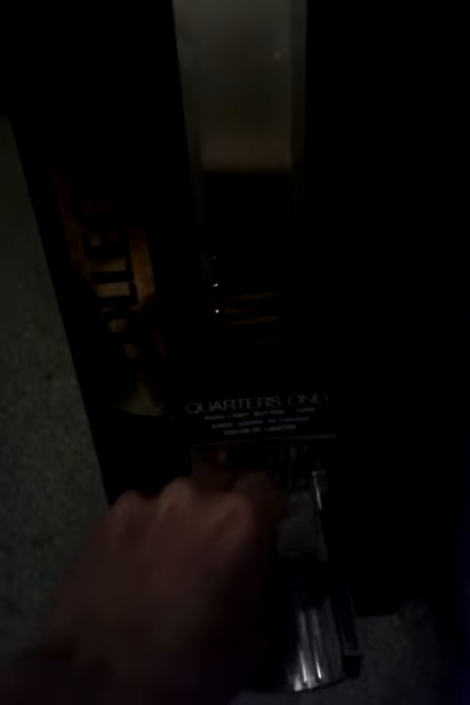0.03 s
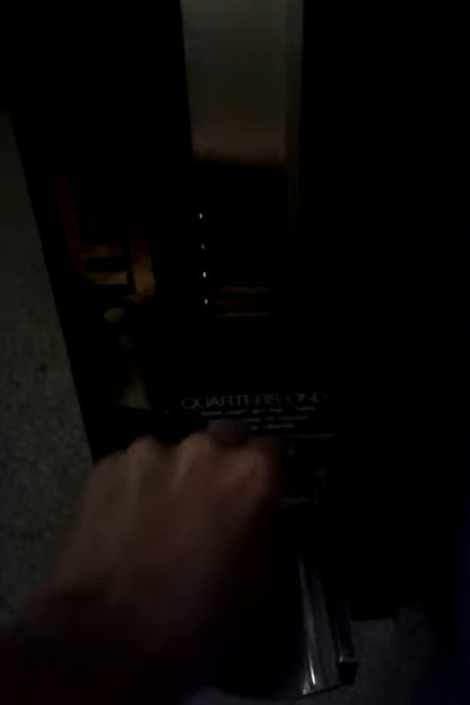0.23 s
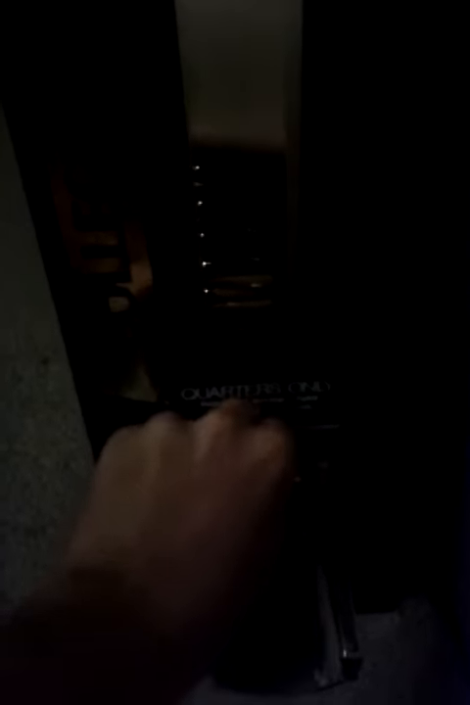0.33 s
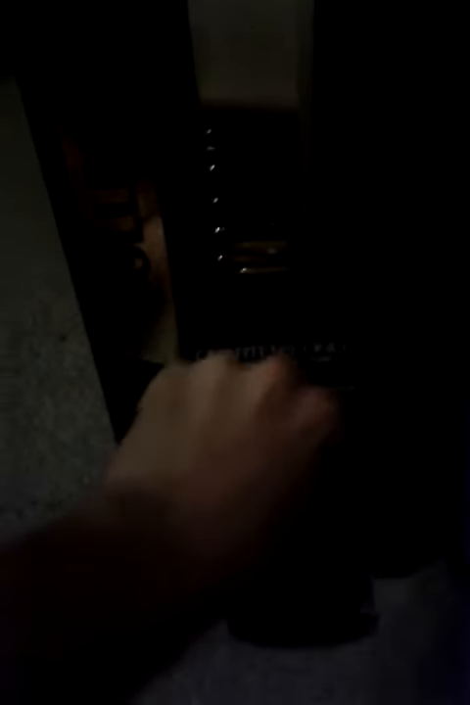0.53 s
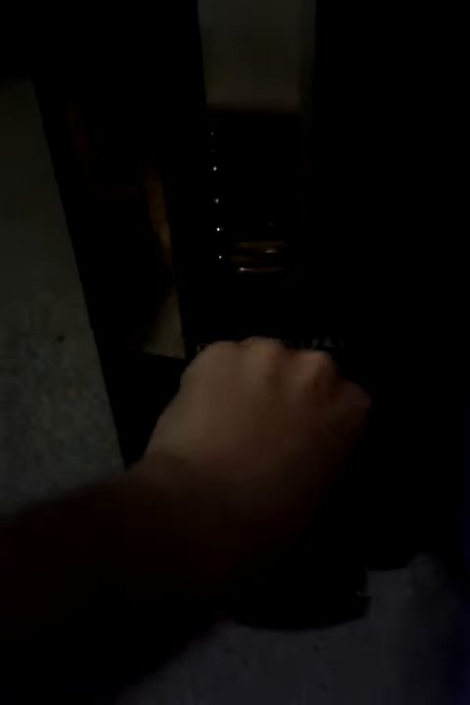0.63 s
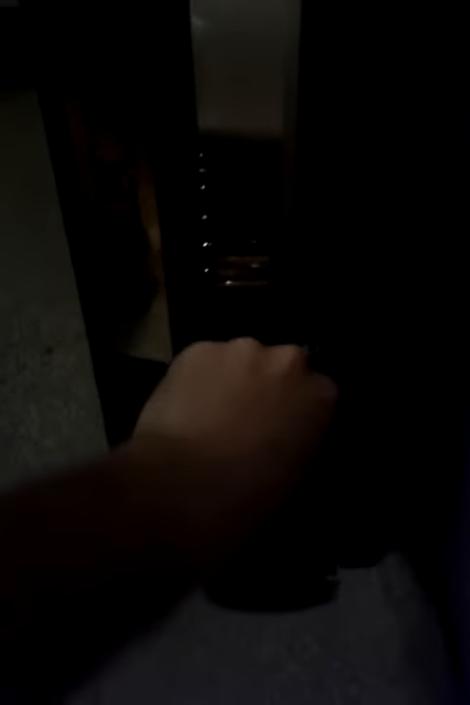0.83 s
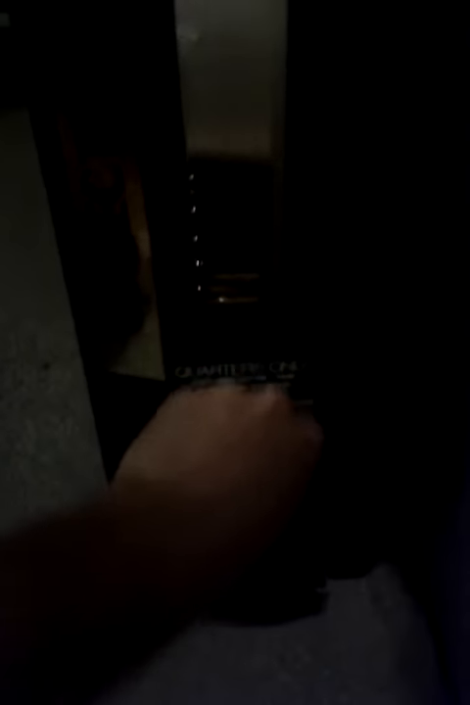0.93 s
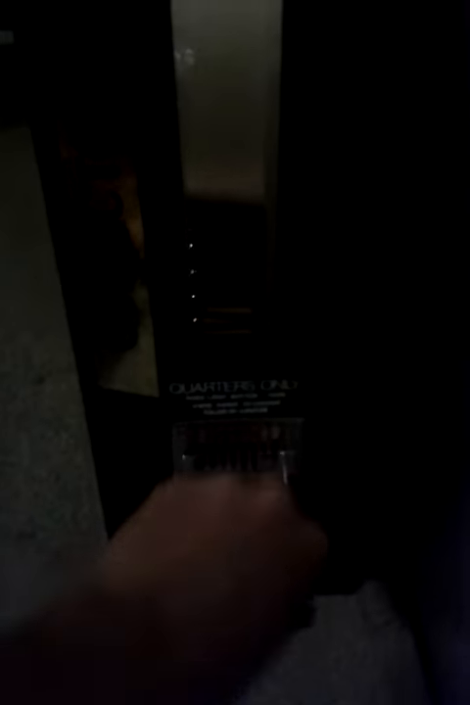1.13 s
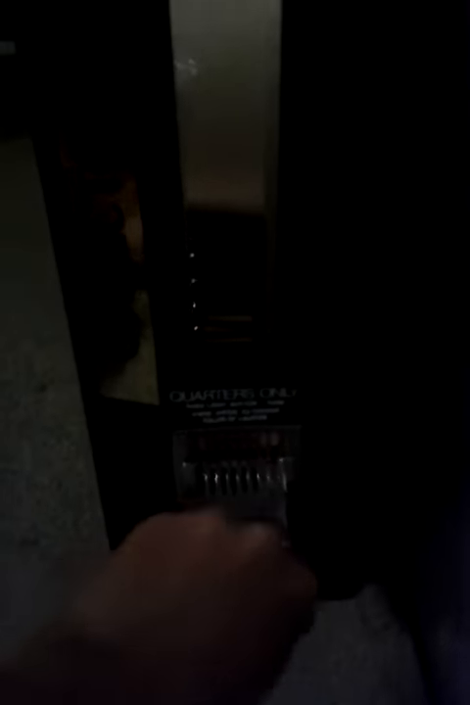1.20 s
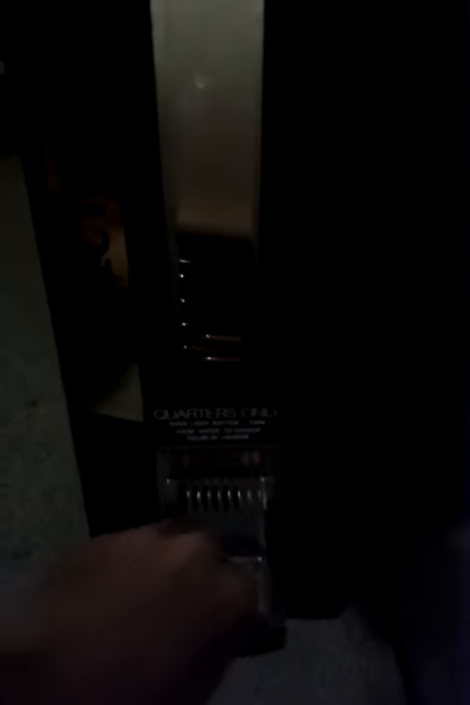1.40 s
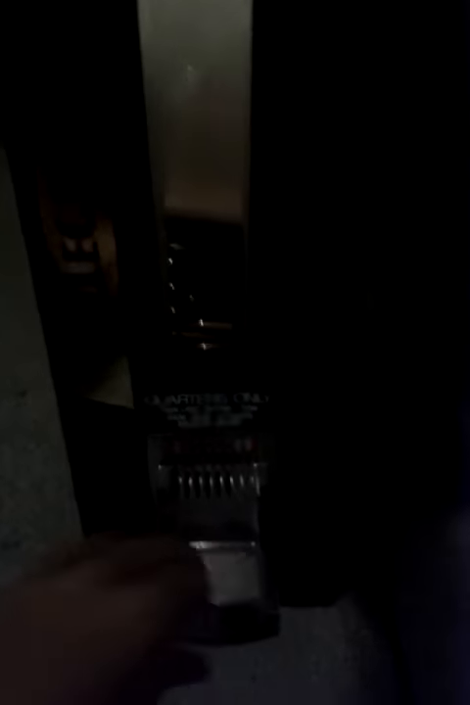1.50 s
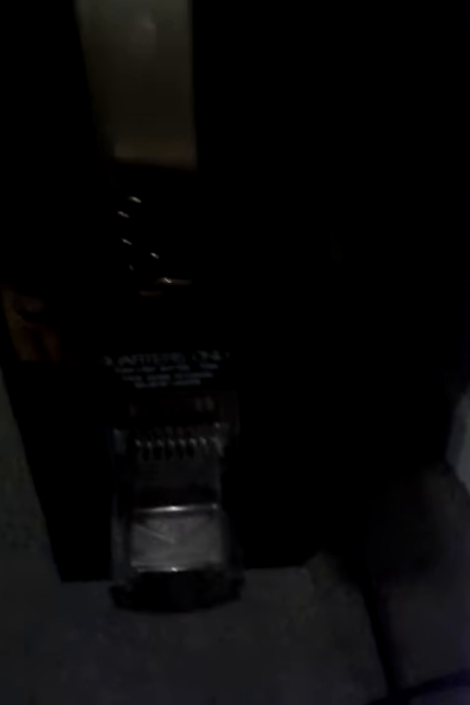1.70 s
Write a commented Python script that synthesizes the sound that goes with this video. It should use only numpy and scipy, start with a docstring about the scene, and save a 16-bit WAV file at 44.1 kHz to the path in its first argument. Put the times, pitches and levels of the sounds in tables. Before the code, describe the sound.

Metal slide clacking and scraping in and out of a vending machine, loose parts rattling.

```python
"""In a small quiet room, a hand pushes the metal slide of a vending machine home and draws it back.
The slide scrapes and clacks against its guides and stops, and loose parts rattle inside. These sounds are
bursts of tiny contacts that set the metal ringing. Dry metal squeaks as it slips, catching edges clang,
and a pawl (a small spring-loaded catch) ticks over a ratchet, mostly on the way out. The hollow cabinet
rumbles and booms. A limiter holds down the loudest clacks."""
import sys
import numpy as np
from scipy import signal
from scipy.fft import rfft, irfft
from scipy.io import wavfile
from scipy.ndimage import uniform_filter1d, minimum_filter1d

SR = 44100
rng = np.random.default_rng(int(sys.argv[2]) if len(sys.argv) > 2 else 0)


def waveform_to_disk(signal):
    """Save audio, clipped to [-1, 1], as 16-bit WAV at the path in sys.argv[1]."""
    frames = np.transpose(np.atleast_2d(signal))
    scaled = np.clip(frames, -1, 1) * 32767
    samples = np.round(scaled).astype(np.int16)
    wavfile.write(sys.argv[1], SR, samples)


N = 77175
T = np.arange(N) / SR
HZ = np.maximum(np.arange(N + 1) * SR / (2 * N), 1)

# loose parts rattle inside: start_s, rise_s, hold_s, level_db, treble_db
RATTLE_HITS = [(.000, .002, 0.0068, -33.5, 4), (0.084, .0033, 0.018, -30, -10.5),
               (0.106, .0033, 0.0045, -33, -4.5), (0.155, 0.00041, 0.0018, -28.5, -8),
               (0.199, 0.0057, .003, -29, 3), (0.686, .0026, .006, -31, 11.5),
               (0.76, .004, .005, -22.5, 5.5), (0.771, 0.0012, 0.0068, -11, 0.5),
               (0.794, .002, .002, -16, -8), (0.831, .002, 0.0067, -21.5, -3.5),
               (.840, 0.00079, 0.0076, -21.5, 5), (0.887, .0032, 0.012, -28, 0),
               (0.9153, .002, 0.0057, -17, -0.5), (0.937, .005, 0.0072, -21.5, 0.5),
               (0.979, .0017, 0.0065, -29, 4.5), (1.003, .005, 0.02, -26, -2),
               (1.065, .008, .003, -22, -0.5), (1.0805, .002, 0.01, -17, 0.5)]
# how loudly the slide rubs along its guides: time_s, level_db
RUB_LEVELS = [(0, -37), (.08, -45), (.19, -41.5), (.26, -24), (.35, -29), (.55, -37.5), (.75, -46.5),
              (1.03, -41), (1.09, -28), (1.22, -31), (1.36, -26.5), (1.47, -29), (1.60, -37), (1.66, -42.5),
              (1.75, -44)]
# the slide hits its guides and stops: start_s, rise_s, hold_s, level_db, bass_db, middle_db, treble_db
CLACK_HITS = [(.215, .0003, 0.001, -13.5, 0, 4.5, -2), (0.221, .005, 0.042, -17, 4, 7.5, -2.5),
              (0.264, .001, 0.0032, -21, 7, 6, 13), (0.28, 0.0044, .012, -19, 1.5, 10, 3),
              (0.316, 0.0035, 0.0024, -20.5, 7.5, 7, 6), (0.543, 0.00074, 0.011, -17, 7, 10.5, -0.5),
              (0.592, 0.00088, .016, -5, 4, 1, -2.5), (0.603, .003, 0.017, -3.5, -1, 1, 1.5),
              (.641, .002, 0.0033, -19, 3.5, 0, 9.5), (0.65, 0.0027, 0.0041, -21, 6, -1, 11),
              (1.368, 0.0024, 0.012, -16, -6, 5.5, -2), (1.385, 0.0012, 0.0098, -7.5, 2, -2.5, 5.5),
              (1.409, .002, 0.011, -16, 13.5, 7, -3), (1.429, 0.0033, 0.031, -27, 18, 7.5, -8),
              (1.494, 0.0027, 0.0029, -26, 1, 10.5, -4), (1.592, 0.0032, 0.0046, -38.5, 21, 17.5, -14)]
# dry metal starts to slip: start_s, pitch_hz, level_db
SQUEAK_SLIPS = [(0.216, 6080, -23.5), (0.399, 5920, -12.5)]
# the cabinet takes the weight of the slide: start_s, thud_db, boom_db
THUMP_HITS = [(0.217, -29, -21.5), (.245, -37.5, -21.5), (0.391, -28.5, -34.5), (0.469, -41, -51),
              (0.607, -21, -43), (1.394, -25, -15)]
# the pawl drops over a tooth: start_s, level_db, pitch_hz
PAWL_TICKS = [(0.3657, -16, 6900), (1.124, -15.5, 3680), (1.1440, -15.5, 3520), (1.1600, -16, 3820),
              (1.1737, -16.5, 3790), (1.1920, -17.5, 5620), (1.2170, -17, 5260), (1.272, -11.5, 7770)]
# the slide grinds in and out: start_s, rise_s, hold_s, level_db, bass_db, treble_db
SCRAPE_STROKES = [(0.394, 0.015, 0.059, -9, -8.5, -4), (0.44, 0.0045, 0.0084, -11.5, -2, 0.5),
                  (0.459, 0.0054, 0.016, -10, 2, 2), (0.484, 0.0015, 0.012, -15, 13, 0),
                  (1.233, 0.0044, 0.015, -12.5, -16, -5.5), (1.256, 0.013, 0.0075, -9.5, -11.5, -1.5),
                  (1.278, 0.0025, 0.0035, -15, 6.5, -2.5), (1.303, .005, 0.051, -22, 5.5, -6)]
# an edge catches: start_s, pitch_hz, level_db
EDGE_CATCHES = [(.398, 2314, -18), (.441, 1872, -2), (.443, 827, -18.5), (.478, 1108, -28),
                (.526, 827, -17.5), (.596, 2012, -11), (0.596, 2510, -10), (.607, 824, -20.5),
                (.640, 780, -21.5), (.655, 2441, -12), (0.774, 2911, -14.5), (0.778, 3995, -23),
                (.779, 2015, -20), (.851, 2025, -20), (1.082, 2130, -16), (1.083, 2510, -17),
                (1.237, 1180, -23), (1.237, 2510, -12), (1.391, 5880, -9), (1.409, 2164, -16)]

# the tones each part rings with: pitch_hz, level_db, fade_s (every fade_s is the time to drop 60 dB)
SLIDE_TONES = [(388, -14, .3), (1056, -8, .25), (1112, -6, .22), (1141, -4, .28), (1180, -8, .15),
               (1277, -11, .25), (1661, -12, .22), (1890, 2, .22), (2318, -7, .22), (2582, -5, .3)]
RACK_TONES = [(1421, -15, .22), (1753, -9, .25), (2025, 1, .13), (2130, -7, .11), (2441, -3, .15),
              (2510, -7, .1), (2911, -7, .16), (3182, -13, .2), (3995, -12, .2), (5990, -18, .08),
              (6239, -18, .18)]
PANEL_TONES = [(827, 0, .36), (780, -8, .3)]
CABINET_TONES = [(124, 0, .19)]

# the colour of each noise, or how strong it is from low to high: frequency_hz, level_db
RATTLE_SHAPE = [(50, -36), (130, -30), (600, -20.5), (850, -6), (1150, -13.5), (1550, -5), (1800, -5),
                (2100, 1.5), (2550, -1), (3200, -8.5), (3600, -5), (4200, -8.5), (4800, -14), (6200, -18),
                (8500, -17.5)]
RUB_SHAPE = [(25, -56), (80, -31), (108, -5), (135, -1), (175, -4), (220, -11.5), (290, -7.5), (420, -18.5),
             (700, -16.5), (1100, -13), (1500, -20.5), (2200, -13), (3300, -23), (8000, -34)]
CLACK_SHAPE = [(80, -25.5), (130, -8.5), (220, -11.5), (400, -8.5), (650, -7.5), (830, -5), (1150, -6.5),
               (1450, -3.5), (1800, 0), (2300, 4), (2800, -3), (3500, -5), (4900, -12), (6000, -8.5),
               (6700, -13.5), (7500, -15.5), (8500, -9.5)]
THUMP_SHAPE = [(20, -10), (45, -12), (80, -19.5), (125, 11.5), (180, -20.5), (300, -2), (600, -16)]
TICK_SHAPE = [(200, -30.5), (1000, -27), (1700, 3.5), (2600, -3), (3100, 3.5), (3700, 0), (4400, -9.5),
              (5500, -1.5), (6700, -5), (7600, -1.5), (8500, 8.5)]
SCRAPE_SHAPE = [(80, -34.5), (250, -12.5), (700, -4.5), (920, -0.5), (1170, 4), (1400, -11), (2050, 5),
                (2500, 1.5), (3000, -4.5), (3600, -3), (4800, -7), (6000, -9.5), (8500, -11)]

# how long the room echoes: frequency_hz, fade_s
ROOM_FADES = [(100, 0.87), (800, 0.34), (2500, 0.35), (8000, 0.28)]

BASS_HZ, MIDDLE_HZ, CORE_HZ, TREBLE_HZ = 360, 1000, 1970, 5570  # where a hit's tone balance is set
RATTLE_RING_DB, CLACK_RING_DB, SCRAPE_RING_DB = -24.5, -15, -26  # ringing, relative to the hit


def from_db(db):
    """Turn decibels into a number to multiply by."""
    return 10 ** (np.asarray(db) / 20)


def at_hz(points, hz):
    """Read between the rows of a table, giving each octave equal space."""
    frequencies, values = np.transpose(points)
    return np.interp(np.log(hz), np.log(frequencies), values)


def coloured(x, shape, boost_db=0):
    """Filter a sound to a colour at equal power, then boost or cut it at each frequency."""
    db = at_hz(shape, HZ) - 20 * np.log10(1 + (HZ / 10000) ** 8)
    gain = from_db(db) / np.sqrt(np.mean(from_db(db) ** 2)) * from_db(boost_db)
    size = 2 ** 17
    cepstrum = irfft(np.interp(np.arange(size // 2 + 1) * SR / size, HZ, np.log(gain)))
    # fold the filter forward in time, so nothing sounds before its hit
    cepstrum[1:size // 2] *= 2
    cepstrum[size // 2 + 1:] = 0
    return irfft(rfft(x, size) * np.exp(rfft(cepstrum)))[:N]


def envelope(start_s, rise_s, hold_s, fade_s):
    """Loudness that rises in a straight line, holds, then dies away."""
    rise = np.clip((T - start_s) / max(rise_s, 1e-4), 0, 1)
    return rise * from_db(-60 * np.clip((T - start_s - rise_s - hold_s) / fade_s, 0, 3))


def grit(contacts_per_s=3000, spread_db=3.5, contact_share=0.54):
    """Tiny metal contacts of uneven size over a smooth rubbing hiss."""
    contacts = (rng.random(N) < contacts_per_s / SR) * rng.choice([-1, 1], N)
    contacts = contacts * from_db(spread_db * np.minimum(rng.exponential(1, N), 3))
    hiss = rng.standard_normal(N)
    return np.sqrt(contact_share) * contacts / contacts.std() + np.sqrt(1 - contact_share) * hiss


def resonances(tones, lift_db, width_hz=30, base_db=-1.5):
    """The boost in dB that a metal part gives to noise near its own tones."""
    power = sum(from_db(db / 2 + lift_db) ** 2 / (1 + (2 * (HZ - hz) / width_hz) ** 2)
                for hz, db, _ in tones)
    return base_db + 10 * np.log10(1 + power)


def ring(blows, tones, scatter_db=3.0):
    """Each blow (start_s, level_db) sets every tone ringing, with a slightly random strength."""
    starts, blow_db = np.transpose(blows)
    out = np.zeros(N)
    for hz, tone_db, fade_s in tones:
        clicks = np.zeros(N)
        times = starts + rng.random(len(starts)) / hz  # up to one cycle late
        samples = np.clip((times * SR).astype(int), 0, N - 1)
        clicks[samples] = from_db(blow_db + tone_db + scatter_db * rng.standard_normal(len(starts)))
        decay, angle = from_db(-60 / (fade_s * SR)), 2 * np.pi * hz / SR
        feedback = [1, -2 * decay * np.cos(angle), decay * decay]
        out += signal.lfilter([0, np.sin(angle)], feedback, clicks + 1e-18)
    return out


def in_room(x, echo_db, delay_s=0.0041):
    """The direct sound plus a soft wash of echoes that lasts longest in the bass."""
    octave_edges, tail = 80 * 2. ** np.arange(8), np.zeros(N)
    for low, high in zip(octave_edges, octave_edges[1:]):
        fade = envelope(delay_s, delay_s, 0, at_hz(ROOM_FADES, np.sqrt(low * high)))
        band_filter = signal.butter(2, [low, high], "band", fs=SR, output="sos")
        band = signal.sosfilt(band_filter, rng.standard_normal(N))
        tail += band * fade / np.sqrt(np.sum(fade ** 2))
    return x + from_db(echo_db) * signal.fftconvolve(x, tail)[:N]


def rattles():
    """Loose parts chatter lightly against the rack and leave it ringing."""
    out = np.zeros(N)
    body_db = resonances(RACK_TONES + PANEL_TONES, lift_db=0)
    for start, rise, hold, db, treble_db in RATTLE_HITS:
        balance_db = at_hz([(CORE_HZ, 0), (TREBLE_HZ, treble_db)], HZ)
        burst = grit() * envelope(start, rise, hold, fade_s=0.05)
        out += from_db(db) * coloured(burst, RATTLE_SHAPE, balance_db + body_db)
    blows = [(start + rise, db + RATTLE_RING_DB) for start, rise, _, db, _ in RATTLE_HITS]
    return in_room(out, echo_db=-7) + ring(blows, RACK_TONES)


def cabinet_rumble():
    """The hollow case rumbles under the rubbing slide."""
    level = from_db(np.interp(T, *np.transpose(RUB_LEVELS)))
    return coloured(level * grit(), RUB_SHAPE)


def clacks(low_cut_hz=138):
    """Bursts of hard contacts pass through the slide, rack and panel, and the rack rings on."""
    out = np.zeros(N)
    body_db = resonances(SLIDE_TONES + RACK_TONES + PANEL_TONES, lift_db=2.5)
    for start, rise, hold, db, bass_db, middle_db, treble_db in CLACK_HITS:
        balance = [(BASS_HZ, bass_db), (MIDDLE_HZ, middle_db), (CORE_HZ, 0), (TREBLE_HZ, treble_db)]
        burst = grit() * envelope(start, rise, hold, fade_s=0.072)
        out += from_db(db) * coloured(burst, CLACK_SHAPE, at_hz(balance, HZ) + body_db)
    out = signal.sosfilt(signal.butter(2, low_cut_hz, "high", fs=SR, output="sos"), out)
    blows = [(start + rise, db + CLACK_RING_DB) for start, rise, _, db, *_ in CLACK_HITS]
    return in_room(out, echo_db=-7) + ring(blows, RACK_TONES)


def squeaks(wobble_hz=129):
    """Dry metal sticks and slips, making a very short chirp with a shaky pitch."""
    out = np.zeros(N)
    wobble = uniform_filter1d(rng.standard_normal(N), size=60)
    for start, hz, db in SQUEAK_SLIPS:
        pitch_hz = hz + wobble_hz * wobble / wobble.std()
        tone = np.sqrt(2) * np.sin(2 * np.pi * np.cumsum(pitch_hz) / SR)
        out += from_db(db) * envelope(start, rise_s=0.0027, hold_s=0.003, fade_s=0.015) * tone
    return out


def cabinet_thumps():
    """Heavy blows give the hollow case a dull thud and a low, ringing boom."""
    force = sum(from_db(thud_db) * envelope(start, rise_s=0.0013, hold_s=0.0045, fade_s=0.065)
                for start, thud_db, _ in THUMP_HITS)
    thuds = coloured(force * rng.standard_normal(N), THUMP_SHAPE)
    booms = ring([(start, boom_db) for start, _, boom_db in THUMP_HITS], CABINET_TONES)
    return thuds + booms


def ratchet(rise_s=0.0005, ping_db=-0.5, ping_fade_s=0.021):
    """The pawl ticks and pings. On the way out the pings climb unevenly as the spring tightens."""
    force = sum(from_db(db) * envelope(start, rise_s, hold_s=0.0027, fade_s=0.016)
                for start, db, _ in PAWL_TICKS)
    pings = sum(ring([(start + rise_s, db)], [(hz, ping_db, ping_fade_s)])
                for start, db, hz in PAWL_TICKS)
    ticks = coloured(force * rng.standard_normal(N), TICK_SHAPE)
    return in_room(ticks + pings, echo_db=-6)


def scrapes():
    """Grinding contacts make the sliding plate sing in two broad bands about an octave apart."""
    out = np.zeros(N)
    body_db = resonances(SLIDE_TONES, lift_db=-3.5)
    for start, rise, hold, db, bass_db, treble_db in SCRAPE_STROKES:
        balance = [(BASS_HZ, bass_db), (MIDDLE_HZ, 0), (CORE_HZ, 0), (TREBLE_HZ, treble_db)]
        burst = grit() * envelope(start, rise, hold, fade_s=0.072)
        out += from_db(db) * coloured(burst, SCRAPE_SHAPE, at_hz(balance, HZ) + body_db)
    blows = [(start + rise, db + SCRAPE_RING_DB) for start, rise, _, db, *_ in SCRAPE_STROKES]
    return in_room(out, echo_db=-5) + ring(blows, SLIDE_TONES)


def clangs():
    """Each catching edge strikes the one tone of the slide, rack or panel nearest its pitch."""
    out = np.zeros(N)
    tones = SLIDE_TONES + RACK_TONES + PANEL_TONES
    for start, pitch_hz, db in EDGE_CATCHES:
        hz, _, fade_s = min(tones, key=lambda tone: abs(tone[0] - pitch_hz))
        out += ring([(start, db)], [(hz, 0, fade_s)])
    return out


def scene():
    """The machine close by, over a faint low background noise, in one channel."""
    background = from_db(-55) * coloured(rng.standard_normal(N), RUB_SHAPE)
    metal = clacks() + scrapes() + rattles() + clangs() + ratchet() + squeaks()
    cabinet = cabinet_rumble() + cabinet_thumps()
    return (background + metal + cabinet)[None]


def record(dry, mic_top_hz=7790, limit=0.67, strength=0.82, window_s=0.00037, clip_at=0.73):
    """The microphone loses the high treble, a fast limiter turns peaks down, and the tallest clip."""
    x = signal.sosfilt(signal.butter(18, mic_top_hz, fs=SR, output="sos"), dry)
    x = signal.sosfilt(signal.cheby2(12, 60, 9800, fs=SR, output="sos"), x)  # cut above 9800 Hz
    span = int(window_s * SR)
    needed_gain = limit / np.maximum(abs(x), limit)
    smooth_gain = uniform_filter1d(minimum_filter1d(needed_gain, span), span)
    clipped = np.clip(x * smooth_gain ** strength, -clip_at, clip_at)
    return signal.sosfilt(signal.cheby2(20, 60, 16400, fs=SR, output="sos"), clipped)  # cut the very top


dry = scene()
out = record(dry)
waveform_to_disk(out)
```